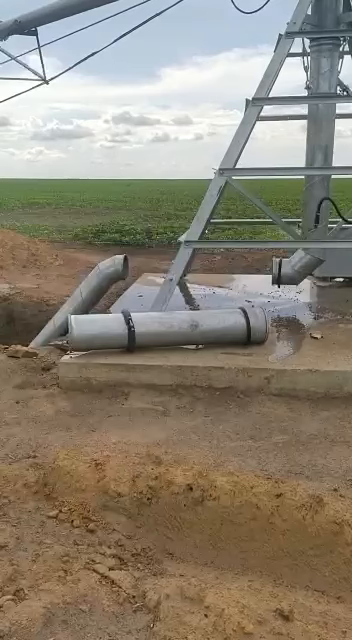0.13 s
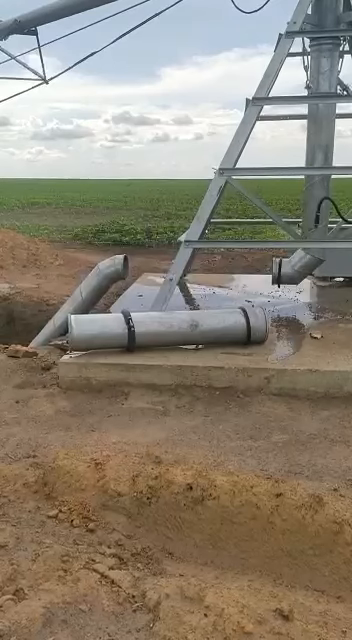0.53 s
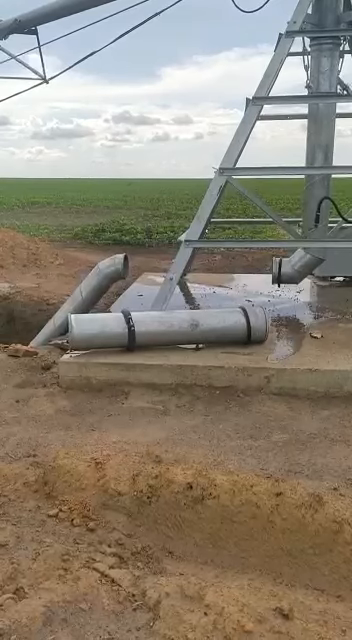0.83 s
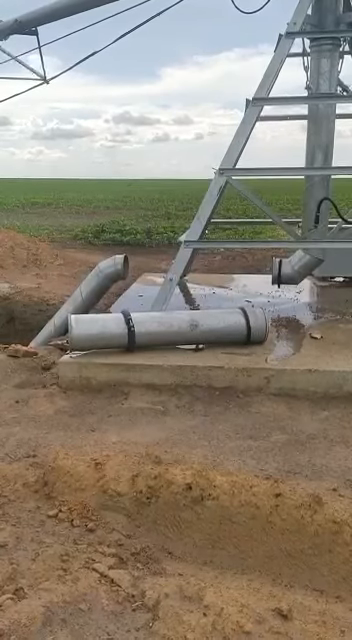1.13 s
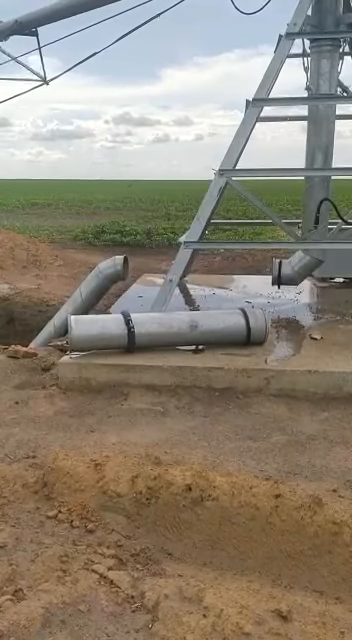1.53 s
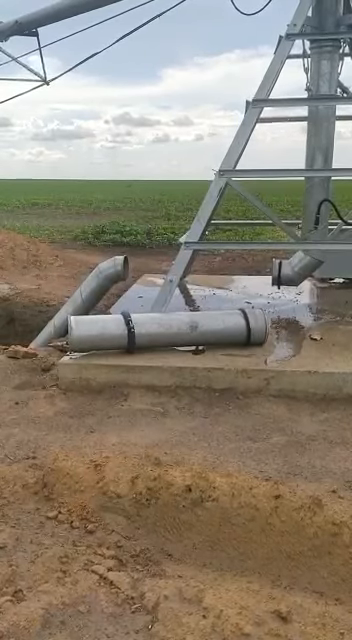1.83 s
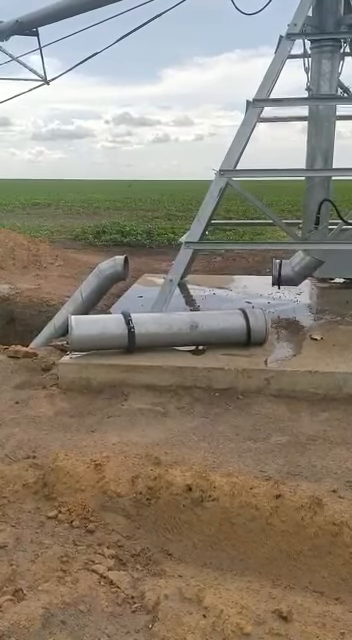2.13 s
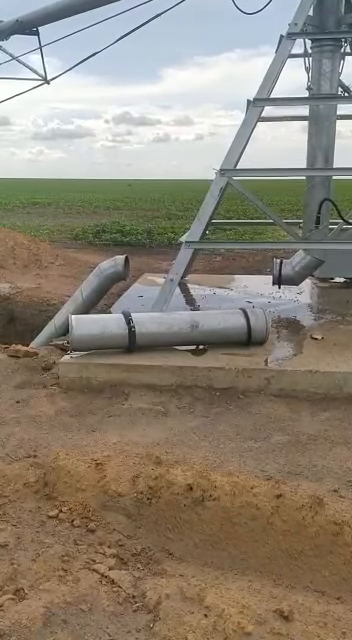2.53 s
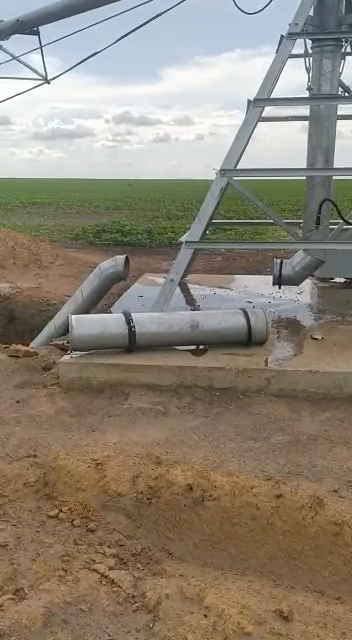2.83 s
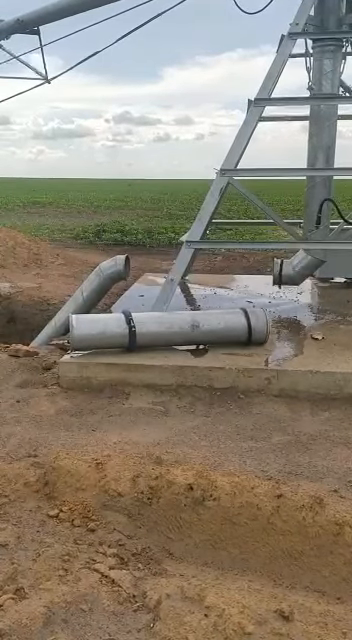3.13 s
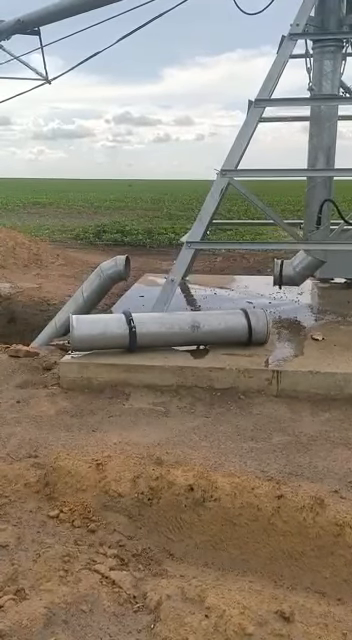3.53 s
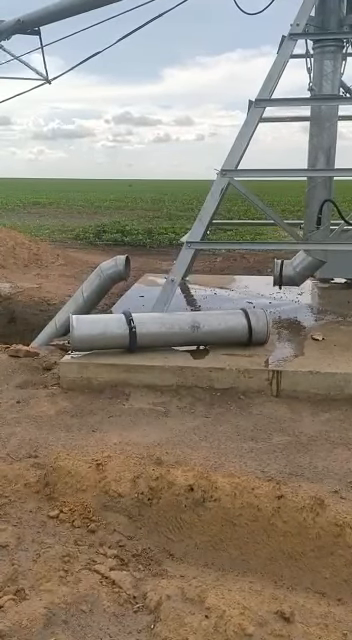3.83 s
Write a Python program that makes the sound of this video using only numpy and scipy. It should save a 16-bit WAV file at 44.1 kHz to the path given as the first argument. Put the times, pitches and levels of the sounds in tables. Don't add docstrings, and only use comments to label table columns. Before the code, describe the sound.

Wind buffeting a handheld phone microphone in low thuds, over a steady airy hiss from a pipe

```python
import sys
import numpy as np
from scipy import signal
from scipy.fft import rfft, irfft
from scipy.io import wavfile

SR = 44100
rng = np.random.default_rng(int(sys.argv[2]) if len(sys.argv) > 2 else 0)


def bounce(signal):
    frames = np.transpose(np.atleast_2d(signal))
    limited = np.clip(frames, -1, 1)
    pcm = np.round(limited * 32767).astype(np.int16)
    wavfile.write(sys.argv[1], SR, pcm)


def gain_from_decibels(decibels):
    exponent = np.asarray(decibels, float) / 20
    return 10 ** exponent


N = 176400
T = np.arange(N) / SR


def rms_one(x):
    return x / np.sqrt(np.mean(x ** 2) + 1e-20)


def cut(x, hz, kind, order=2):
    return signal.sosfilt(signal.butter(order, hz, kind, fs=SR, output="sos"), x)


def noise_band(low_hz, high_hz):
    return rms_one(cut(rng.standard_normal(N), [low_hz, high_hz], "band"))


def drift(hz):
    r = np.exp(-40 * np.pi * hz / SR)
    slow = signal.lfilter([1], [1, -2 * r, r * r], rng.standard_normal(N // 20 + 2002))[2000:]
    return np.interp(np.arange(N) / 20, np.arange(len(slow)), rms_one(slow))


def wind():
    # (centre [s], length [s], level [dB], swirl pitch [Hz])
    first_gust = [(0.078, 0.017, -20, 126.7), (0.149, 0.047, -23, 111.1), (0.204, 0.013, -15, 133.9),
                  (0.23, 0.015, -21, 117.5), (0.293, 0.018, -15, 95.2), (0.362, 0.035, -13, 130),
                  (0.398, 0.037, -18, 143.1), (0.456, 0.12, -17.5, 117.7), (0.577, 0.022, -19.5, 109.3),
                  (0.642, 0.066, -20.5, 145.9), (0.701, 0.048, -18.5, 147.5), (0.744, 0.025, -16.5, 135.3),
                  (0.774, 0.024, -15.5, 124.3), (0.83, 0.064, -19.5, 128.7), (0.886, 0.035, -17.5, 121.4),
                  (0.927, 0.019, -18, 167.2), (0.958, 0.043, -22.5, 120.1), (1.014, 0.039, -14.5, 135.4),
                  (1.066, 0.021, -13, 207.6), (1.108, 0.019, -9.5, 147), (1.179, 0.0156, -24.5, 161),
                  (1.219, 0.027, -12.5, 134.5), (1.245, 0.025, -15, 152.9), (1.275, 0.031, -23, 100.1),
                  (1.307, 0.034, -11, 130), (1.333, 0.028, -17.5, 145.4), (1.371, 0.055, -15, 143),
                  (1.426, 0.055, -17.5, 142.7), (1.483, 0.047, -18, 158.6), (1.62, 0.16, -29.5, 119.3)]
    second_gust = [(1.792, 0.035, -14, 152.8), (1.826, 0.037, -14.5, 174.4), (1.888, 0.072, -13.5, 142.7),
                   (1.942, 0.049, -12, 182), (1.986, 0.038, -12.5, 207.4), (2.044, 0.027, -16.5, 150.6),
                   (2.082, 0.03, -11, 188.5), (2.144, 0.05, -13, 116.6), (2.174, 0.025, -18.5, 144.5),
                   (2.213, 0.056, -17.5, 144.5), (2.267, 0.065, -15, 166.9), (2.318, 0.036, -19, 138.7),
                   (2.347, 0.038, -17, 161.1), (2.388, 0.084, -18.5, 134), (2.432, 0.031, -22, 124.6),
                   (2.481, 0.051, -17, 147), (2.553, 0.028, -11, 186.6), (2.593, 0.076, -15, 200)]
    hardest_gust = [(2.75, 0.03654, -14.5, 160), (2.805, 0.03714, -10, 123.4),
                    (2.862, 0.03438, -7.5, 171.3), (2.891, 0.015, -8, 170.2), (2.929, 0.058, -3.5, 171.5),
                    (2.974, 0.03573, -12.5, 288), (3.019, 0.0219, -11, 321), (3.055, 0.05, -5.5, 240),
                    (3.085, 0.0201, -12.5, 280), (3.107, 0.0228, -12.5, 170.7), (3.132, 0.01997, -6, 296.5),
                    (3.156, 0.0301, -17, 119.2), (3.194, 0.0413, -19, 200), (3.231, 0.0345, -7.5, 260.5),
                    (3.27, 0.0307, -9.5, 258.1), (3.314, 0.0423, -9.5, 221.7), (3.346, 0.0297, -7, 216.3),
                    (3.372, 0.02514, -20, 169.1), (3.473, 0.0439, -16, 172.7), (3.555, 0.059, -11.5, 195.8),
                    (3.624, 0.042, -19, 198.2), (3.673, 0.03, -12.5, 230.6), (3.714, 0.051, -6.5, 200),
                    (3.763, 0.015, -14, 300.2), (3.776, 0.023, -5.5, 235.3), (3.803, 0.012, -9, 253.2),
                    (3.844, 0.046, -15, 197.4), (3.932, 0.1, -31, 153.1), (4, 0.017, -38, 193.3)]
    # (centre [s], length [s], level [dB], swirl pitch [Hz])
    sheltered_gust = [(2.33, 0.11, -24, 154.8), (2.407, 0.03957, -34, 141.8),
                      (2.459, 0.04115, -40.5, 179.9), (2.517, 0.03544, -24.5, 112.4),
                      (2.547, 0.02, -42, 117.8), (2.585, 0.04347, -23, 127.7), (2.643, 0.062, -26.5, 111.1),
                      (2.729, 0.03668, -18.5, 165), (2.793, 0.092, -15.5, 153.4),
                      (2.886, 0.076, -38, 119.9), (2.966, 0.067, -32, 93), (3.146, 0.033, -25.5, 110),
                      (3.233, 0.04, -32, 100), (3.344, 0.045, -34, 100.4), (3.429, 0.038, -32, 97.2),
                      (3.462, 0.026, -23, 97.5), (3.581, 0.039, -30.5, 101.5), (3.642, 0.037, -37, 107.7),
                      (3.733, 0.057, -36, 97.5), (3.771, 0.02, -27.5, 103.3), (3.805, 0.037, -33, 106.2),
                      (3.857, 0.015, -28, 94.7)]
    # (left level [dB], right level [dB])
    lull_db = [-56.5, -34]
    left = eddies(sheltered_gust, lull_db[0])
    right = slammed(eddies(first_gust + second_gust + hardest_gust, lull_db[1]))
    return np.array([left, right])


def eddies(rows, lull_db):
    lull_hz = 130
    power = np.full(N, 1e-9)
    pitch = power * lull_hz
    for centre, length, db, hz in rows:
        half_length = length * 1.2 / 2
        shape = np.exp(-2 * np.abs((T - centre) / half_length) ** 2.7)
        shape = gain_from_decibels(2 * (db + 2)) * shape
        power = power + shape
        pitch = pitch + shape * hz

    swirl_hz = 0.88 * pitch / power * 2 ** (0.2 * drift(24.91))
    cycles = np.cumsum(swirl_hz) / SR
    swirl = np.real(churn(cycles) * np.exp(2j * np.pi * cycles))
    swirl = np.sqrt(power) * rms_one(swirl)

    fine_hz = 446
    fine_db = -25 + 27.6 * np.log10(power) + 6.5 * drift(53.6)
    fine = gain_from_decibels(fine_db) * noise_band(fine_hz * 0.87, fine_hz * 1.34)

    lull = gain_from_decibels(lull_db + 1.2 * drift(5.2)) * noise_band(lull_hz * 0.5, lull_hz)

    pressure = cut(swirl, 630, "low", order=3) + fine + lull
    pressure = cut(pressure, 65.8, "high", order=3)
    port_top = 0.71
    return pressure / (1 + (pressure / port_top) ** 4) ** 0.25


def churn(cycles):
    spread = 0.52
    evenness = 0.29
    r = np.exp(-2 * np.pi * spread / 16)
    real, imaginary = signal.lfilter([1], [1, -2 * r, r * r], rng.standard_normal((2, 32000)))
    z = np.interp(16 * cycles, np.arange(32000), rms_one(real) + 1j * rms_one(imaginary))
    return z / (np.abs(z) + 0.39) ** evenness


def slammed(pressure):
    # (time [s], peak level [dB])
    slams = [(1.9408, 1.5), (2.8905, 5), (2.9153, 4.5), (2.927, 7), (2.9443, 4), (3.0492, 5.5), (3.0612, 9),
             (3.0674, 6), (3.1327, 5.5), (3.2292, 3.5), (3.5438, 5), (3.679, -7.5), (3.707, 7.5),
             (3.7774, 5.5), (3.9995, -7)]
    swing_hz, length_s = 198.6, 0.0017
    no_net_push = np.exp(-(np.pi * swing_hz * length_s) ** 2)
    for s, db in slams:
        window = np.exp(-((T - s) / length_s) ** 2)
        swing = np.cos(2 * np.pi * swing_hz * (T - s)) - no_net_push
        pressure = pressure * (1 - window) + gain_from_decibels(db) * window * swing
    return pressure


def hiss():
    # (time [s], level [dB], tilt [dB per octave])
    vent = [(0, -56.5, -0.63), (1.3, -54.5, 0.07), (2.029, -53.5, 0.07), (2.15, -46, 3),
            (2.231, -41.5, 0.4), (2.329, -50.5, -0.5), (2.39, -54, -0.5), (2.43, -49.5, 0.5),
            (2.48, -58, -0.2), (2.57, -51, 0), (2.65, -50.5, 0.4), (2.759, -54.5, 0.3), (2.82, -65, -1),
            (2.97, -52.5, 4.5), (3.07, -59, 1.4), (3.17, -69.5, -2), (3.449, -71, 3), (4.0, -78.5, -1.5)]
    # (frequency [Hz], level [dB])
    colour = [(100, 5), (220, -3), (420, -12), (1200, -14.5), (2000, -12.5), (3800, -15.5), (6000, -18.5),
              (11000, -22.5)]
    # (frequency [Hz], width [Hz], left level [dB], right level [dB])
    pipe = [(200, 59, 8.5, 10.5), (290, 40, 6, -10), (677, 214, 13.5, 12), (930, 154, 9.5, 0),
            (1777, 950, 1.5, 7.5), (3110, 83, -9.5, 1), (3440, 310, 4, 3)]
    # (frequency [Hz], lag [cycles])
    left_lag = [(700, 0), (1800, .45), (3250, 2.5), (4250, 4.44), (5200, 4.56), (5950, 5.0), (6600, 5.44),
                (8000, 5.58), (9000, 6.0), (11500, 6.2)]
    # (time [s], level [dB])
    scatter = [(0, -1.), (.7, -1.5), (1.3, -2.5), (1.6, -7), (2.4, -6), (2.6, -2.5), (3.1, -3), (4, 0.)]

    s, vent_db, tilt = np.transpose(vent)
    level_db = np.interp(T, s, vent_db) + 0.8 * drift(24.0)
    tilt = np.interp(T, s, tilt)

    f = np.arange(N // 2 + 1) * SR / N
    lag = np.exp(-2j * np.pi * np.interp(f, *np.transpose(left_lag)))
    direct = rfft(rng.standard_normal((2, 1, N))) * np.array([lag, np.ones_like(lag)])
    scattered = gain_from_decibels(np.interp(T, *np.transpose(scatter))) * rng.standard_normal((2, 2, N))

    peaks_db = 0
    for hz, width, left_db, right_db in pipe:
        peaks_db = peaks_db + np.array([[left_db], [right_db]]) / (1 + (2 * (f - hz) / width) ** 2)
    ringing = irfft((direct + rfft(scattered)) * gain_from_decibels(peaks_db), N)

    out = 0
    edges = 70 * 2 ** np.arange(0, 8, 0.5)
    colour_hz, colour_db = np.transpose(colour)
    for k, (low, high) in enumerate(zip(edges, edges[1:])):
        hz = np.sqrt(low * high)
        db = np.interp(np.log(hz), np.log(colour_hz), colour_db) + tilt * np.log2(hz / 7000)
        flicker_db = 1.0 * drift(22.3)
        out = out + gain_from_decibels(db + level_db + flicker_db) * cut(ringing[k % 2], [low, high], "band")
    return gain_from_decibels(25) * out


def spit():
    # (time [s], level [dB], lowest frequency [Hz], highest frequency [Hz])
    spits = [
        (2.845, -48.5, 2680, 3480),
        (3.07, -49, 2400, 5000),
    ]
    length_s = 0.012
    out = 0
    for s, db, low_hz, high_hz in spits:
        puff = np.exp(-((T - s) / length_s) ** 2)
        out = out + gain_from_decibels(db) * puff * noise_band(low_hz, high_hz)
    return out


def self_noise():
    return gain_from_decibels(-59) * rng.standard_normal((2, N))


def scene():
    return wind() + hiss() + spit() + self_noise()


def low_pass(x):
    return signal.sosfilt(signal.butter(12, 15200, fs=SR, output="sos"), x)


def record(dry):
    no_rumble = cut(dry, 38, "high")
    steep_low_pass = signal.cheby2(20, 80, 12400, fs=SR, output="sos")
    narrow = signal.sosfilt(steep_low_pass, no_rumble)
    return low_pass(np.clip(narrow, -1, 1))


dry = scene()
out = record(dry)
bounce(out)
```